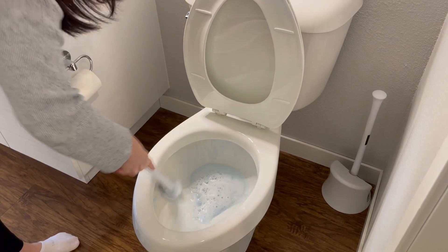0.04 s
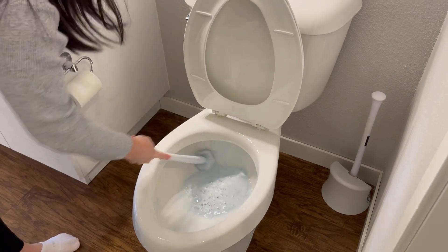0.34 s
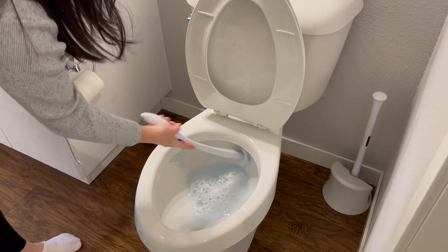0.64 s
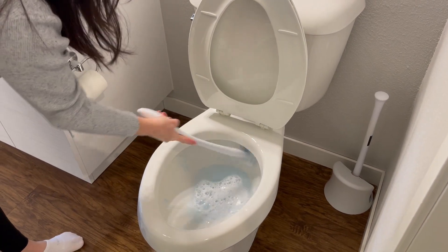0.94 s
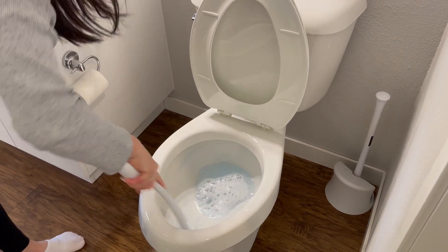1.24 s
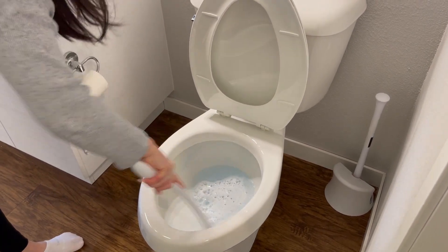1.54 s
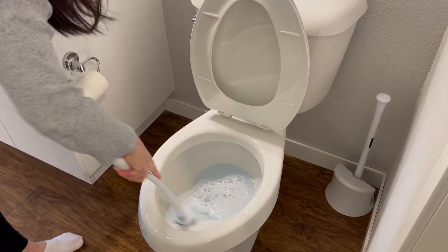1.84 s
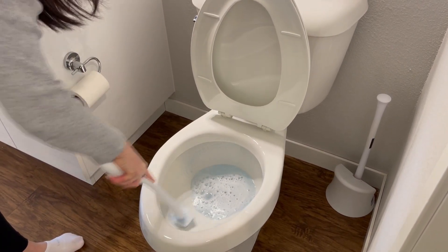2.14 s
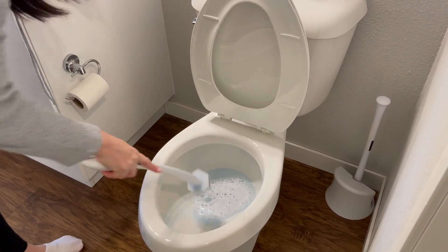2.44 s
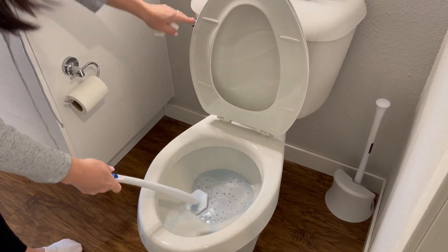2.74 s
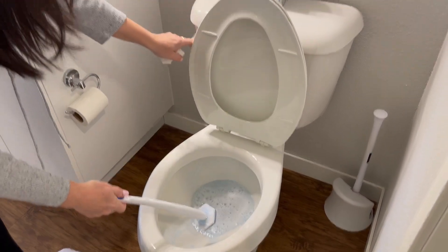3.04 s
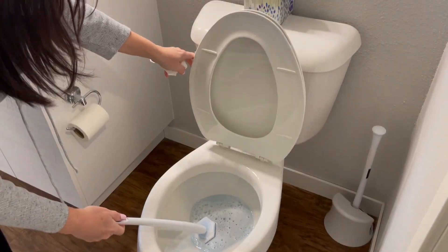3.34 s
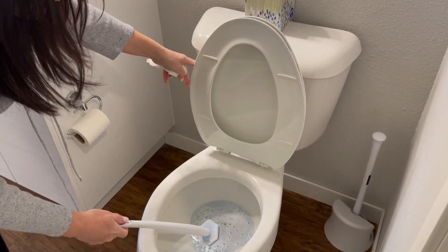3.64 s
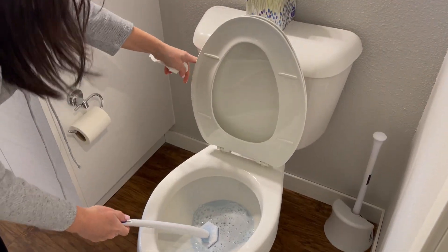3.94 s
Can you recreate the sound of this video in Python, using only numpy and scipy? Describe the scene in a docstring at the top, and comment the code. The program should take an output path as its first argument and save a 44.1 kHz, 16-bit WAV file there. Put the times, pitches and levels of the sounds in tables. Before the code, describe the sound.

A brush scrubs a wet toilet bowl with soft, uneven swishes and squelches until about 2.7 seconds, knocking on porcelain at the start, 0.5 and 1.4 seconds. A metal click and lid clack come near 2.8. At 3.5 the flush lever clunks and its chain chinks; a louder valve thump at 3.7 starts water gurgling and rushing. A fan hums low throughout in the small bathroom.

```python
"""Scrubbing and flushing a toilet

A plastic cleaning wand scrubs a wet bowl in a small, hard-walled bathroom and knocks on the porcelain.
A metal click and the clack of the lid follow; then the flush lever is pressed, its chain chinks, the valve
thumps open and water starts to gurgle as pockets of air ring. A fan hums throughout."""
import sys
import numpy as np
from scipy import signal
from scipy.fft import rfft, irfft, next_fast_len
from scipy.io import wavfile
from scipy.ndimage import map_coordinates

SR = 44100
rng = np.random.default_rng(int(sys.argv[2]) if len(sys.argv) > 2 else 0)


def dump(signal):
    """Clip the signal to [-1, 1] and save it as 16-bit WAV at the path in sys.argv[1]."""
    limited = np.clip(np.atleast_2d(signal).T, -1, 1)
    pcm = np.round(limited * 32767).astype(np.int16)
    wavfile.write(sys.argv[1], SR, pcm)


N = 176400
T = np.arange(SR * 6 // 10) / SR  # time within one event, s


def amp(db):
    """Decibels to gain."""
    return 10 ** (np.asarray(db) / 20)


def unit(x):
    """Scale to rms 1."""
    return x / np.sqrt(np.mean(x ** 2) + 1e-20)


def burst(x):
    """Scale to the energy of 10 ms at rms 1."""
    return x / np.sqrt(np.sum(x ** 2) * 100 / SR + 1e-20)


def along(points, hz):
    """Interpolate (Hz, value) points on a log axis."""
    knots_hz, values = np.transpose(points)
    return np.interp(np.log(hz + 1), np.log(knots_hz + 1), values)


def filtered(x, response):
    """Apply a complex frequency response."""
    n = x.shape[-1]
    size = next_fast_len(n + 4096)
    return irfft(rfft(x, size) * response(np.fft.rfftfreq(size, 1 / SR)), size)[..., :n]


def coloured(x, spectrum):
    """Minimum-phase filter with the given (Hz, dB) shape."""
    size = 4096
    cepstrum = irfft(np.log(amp(along(spectrum, np.fft.rfftfreq(size, 1 / SR)))))
    cepstrum[1:size // 2] *= 2
    cepstrum[size // 2 + 1:] = 0
    return signal.fftconvolve(x, irfft(np.exp(rfft(cepstrum))))[:len(x)]


def wobble(per_s):
    """Smooth random curve, per_s knots a second."""
    return map_coordinates(rng.standard_normal(int(N * per_s / SR) + 4), [np.arange(N) * per_s / SR])


def ring(modes, attack_s):
    """Damped modes of a struck body; wider modes die sooner."""
    waves = sum(amp(db) * width * np.exp(-np.pi * width * T) * np.sin(2 * np.pi * (hz * T + rng.random()))
                for hz, width, db in modes)
    return burst(waves * (1 - np.exp(-T / attack_s)))


def crack(spectrum, t60_s):
    """Short noise of a contact."""
    return burst(coloured(rng.standard_normal(len(T)) * amp(-60 * T / t60_s), spectrum))


def grainy(spectrum, per_s, spread_db, share=1):
    """Tiny uneven impacts carry a share of the power, noise the rest; rms 1."""
    impacts = (rng.random(N) < per_s / SR) * rng.choice([-1, 1], N)
    grains = unit(impacts * amp(spread_db * np.minimum(rng.exponential(size=N), 5)))
    return unit(coloured(np.sqrt(share) * grains + np.sqrt(1 - share) * rng.standard_normal(N), spectrum))


# Each row: frequency in Hz, left-right correlation.
COHERENCE = [(100, 0.98), (300, 0.81), (900, 0.097), (1700, 0.043), (3000, 0.37), (7000, 0.35),
             (8300, 0.63), (10200, 0.86), (12000, 0.28)]


def diffuse(pair):
    """Two unrelated signals become the left and right of a diffuse field."""
    turn = lambda hz: np.arccos(np.clip(along(COHERENCE, hz), -1, 1)) / 2
    mid, side = filtered(pair, lambda hz: np.array([np.cos(turn(hz)), np.sin(turn(hz))]))
    return np.array([mid + side, mid - side])


# Each row: frequency in Hz, T60 in seconds.
ROOM_DECAY = [(100, 0.86), (250, 0.36), (1400, 0.65), (4000, 0.42), (9000, 0.3), (13000, 0.21)]


def room(x, wet_db):
    """Direct sound plus a diffuse tail off the hard walls."""
    hz, t, bins = signal.stft(rng.standard_normal((2, len(T))), SR, nperseg=256)
    decay = amp(-60 * t / along(ROOM_DECAY, hz)[:, None])
    tail = signal.istft(bins * decay, SR, nperseg=256)[1][:, :len(T)]
    tail = diffuse(tail * (1 - np.exp(-T / 0.0013)))
    tail /= np.linalg.norm(tail[0])
    return x + amp(wet_db) * signal.fftconvolve(x[None], tail, axes=1)[:, :len(x)]


def play(events, sound, wet_db):
    """Place sound(*rest) in the room for each (start s, gain dB, *rest) row."""
    out = np.zeros((2, N))
    for start_s, db, *rest in events:
        event = room(amp(db) * sound(*rest), wet_db)
        start = round(start_s * SR)
        first, end = max(start, 0), min(start + event.shape[1], N)
        if end > first:
            out[:, first:end] += event[:, first - start:end - start]
    return out


# Motor tones and air spectrum. Each row: frequency in Hz, level in dB.
FAN_TONES = [(119.7, -49.5), (74.8, -67)]
FAN_AIR = [(35, -1.5), (70, 4), (100, -1), (300, -7.5), (500, -19), (2000, -30.5), (4000, -43.5),
           (12000, -48)]


def fan():
    """Motor hum over a low rumble of air."""
    t = np.arange(N) / SR
    hum = sum(amp(db + 0.097 * wobble(4.3)) * np.sin(2 * np.pi * hz * t + 0.08 * wobble(6.2))
              for hz, db in FAN_TONES)
    air = filtered(diffuse(rng.standard_normal((2, N))), lambda hz: amp(along(FAN_AIR, hz)))
    return np.sqrt(2) * hum + amp(-54.5) * unit(air)


# Each row: start in seconds, gain in dB.
METAL_CLICKS = [(2.8295, -36), (3.168, -72.5), (3.212, -74)]
# Each row: mode in Hz, width in Hz, gain in dB.
METAL_MODES = [(1420, 24, -10), (4300, 94, -11), (6670, 130, -14), (8060, 170, -10.5), (8350, 190, -3.5),
               (10540, 120, -10.5)]
# Each row: frequency in Hz, gain in dB.
CLICK_SPECTRUM = [(1000, -17), (4400, -11.5), (7400, -4.5), (9500, 0), (11000, 3.5), (13200, -23)]


def metal_clicks():
    """A small metal part clicks and rings brightly."""
    click = lambda: amp(-5) * ring(METAL_MODES, 0.00048) + amp(-7) * crack(CLICK_SPECTRUM, t60_s=0.011)
    return play(METAL_CLICKS, click, wet_db=6.5)


# Each row: start in seconds, gain in dB.
LID_CLACKS = [(2.864, -31.5)]
# Each row: mode in Hz, width in Hz, gain in dB.
LID_MODES = [(191.5, 26, 5.5), (650, 42, -1.5), (900, 13, -6), (1410, 63, -10), (1500, 82, -1),
             (1906, 26, -2.5), (2330, 41, -14), (3250, 90, -5.5)]
# Each row: frequency in Hz, gain in dB.
LID_SPECTRUM = [(200, 5), (900, 5), (1700, -4.5), (2600, -7), (5000, -18), (7000, -36)]


def lid():
    """The raised lid clacks: a brief hollow ring and a dull thud that fills the room."""
    body = play(LID_CLACKS, lambda: amp(-2.5) * ring(LID_MODES, attack_s=0.0026), wet_db=-4)
    thud = play(LID_CLACKS, lambda: amp(-6) * crack(LID_SPECTRUM, t60_s=0.067), wet_db=3)
    return body + thud


# Each row: start in seconds, gain in dB.
LEVER_HITS = [(3.519, -30), (3.523, -32), (3.529, -34.5)]
# Each row: mode in Hz, width in Hz, gain in dB.
LEVER_MODES = [(236, 53, 3), (437, 21, 3), (610, 110, 0), (1124, 17, -14), (1400, 19, 0), (2653, 90, -5.5),
               (3100, 210, 0.5)]
# Each row: frequency in Hz, gain in dB.
LEVER_SPECTRUM = [(250, -9), (550, -0.5), (1500, -4.5), (2200, -12), (4200, -18.5), (9000, -17.5),
                  (11500, -16), (13200, -43)]


def lever():
    """The pressed flush lever makes a quick cluster of contacts."""
    hit = lambda: amp(-3) * ring(LEVER_MODES, 0.0015) + amp(-6.5) * crack(LEVER_SPECTRUM, t60_s=0.13)
    return play(LEVER_HITS, hit, wet_db=-1)


# Each row: start in seconds, gain in dB.
CHAIN_CHINKS = [(3.612, -38.5), (3.689, -39.5), (3.734, -32), (3.742, -40), (3.79, -55)]
# Each row: frequency in Hz, gain in dB.
CHINK_SPECTRUM = [(2000, -4), (3000, -6.5), (5000, -14), (7000, -9), (8300, -1.5), (9800, 3.5), (11500, 1),
                  (13300, -19)]
RASP_SPECTRUM = [(3200, -3.5), (4200, 7.5), (5800, 4), (7000, -18), (9500, -18), (13000, -36)]


def chain(taut_s=3.611, rasp_db=-40.5):
    """The lever's chain chinks, and rasps as it drags taut."""
    chinks = play(CHAIN_CHINKS, lambda: crack(CHINK_SPECTRUM, t60_s=0.1), wet_db=3)
    rasp = play([(taut_s, rasp_db)], lambda: crack(RASP_SPECTRUM, t60_s=0.2), wet_db=2.5)
    return chinks + rasp


# Each row: start in seconds, gain in dB.
VALVE_THUMPS = [(3.69, -24.5), (3.6975, -17), (3.727, -23.5)]
WATER_SHOVES = [(3.6985, -20), (3.727, -31.5)]
# Each row: mode in Hz, width in Hz, gain in dB.
TANK_MODES = [(226, 26, -1), (345, 29, 3), (421, 49, -.5), (834, 64, -12), (1100, 48, -2.5),
              (1177, 22, -3.5)]
WALL_MODES = [(150, 41, -4.5), (302, 130, -6)]
# Each row: frequency in Hz, gain in dB.
THUMP_SPECTRUM = [(50, -27.5), (130, 3.5), (380, 2.5), (700, -6.5), (1300, 0), (2200, -18.5), (6000, -32)]


def valve():
    """The valve thumps open and water shoves the tank wall."""
    thump = lambda: amp(-5) * ring(TANK_MODES, 0.00087) + amp(-11) * crack(THUMP_SPECTRUM, t60_s=0.05)
    shoves = play(WATER_SHOVES, lambda: ring(WALL_MODES, attack_s=0.0039), wet_db=-3)
    return play(VALVE_THUMPS, thump, wet_db=-0.5) + shoves


# Each row: start in seconds, pitch in Hz, gain in dB, T60 in seconds.
AIR_POCKETS = [(3.659, 670, -23.5, 0.058), (3.808, 684, -29.5, 0.11), (3.822, 746, -36, 0.13),
               (3.828, 351.4, -30.5, 0.14), (3.836, 628.5, -34.5, 0.18), (3.845, 1078, -39, 0.24),
               (3.866, 353.5, -27.5, 0.12), (3.876, 661, -32, 0.12), (3.925, 694, -43, 0.19),
               (3.965, 1380, -45, 0.1), (3.968, 325, -36, 0.1)]


def glugs(attack_s=0.0035, glide_per_s=-0.26):
    """Pockets of air pushed out by the water ring, sinking slightly in pitch."""
    def glug(hz, t60_s):
        tone = np.sin(2 * np.pi * hz * T * (1 + glide_per_s * T / 2))
        return 2 * tone * amp(-60 * T / t60_s) * (1 - np.exp(-T / attack_s))
    return play([(s, db, hz, t60_s) for s, hz, db, t60_s in AIR_POCKETS], glug, wet_db=-5.5)


# Each row: time in seconds, level in dB.
FLOW_LEVELS = [(3.518, -51), (3.56, -50), (3.68, -42), (3.73, -59), (3.8, -41), (3.88, -38.5), (4.0, -44.5)]
# Rush, and the hiss of both drops and pad. Each row: frequency in Hz, gain in dB.
RUSH_SPECTRUM = [(130, -3), (330, 6.5), (500, -7.5), (680, -1.5), (900, -8.5), (1100, -8), (2200, -17.5),
                 (6500, -28), (11500, -26), (13000, -94)]
HISS_SPECTRUM = [(900, -32), (2500, -5), (4600, -1), (7300, -5), (8800, 2), (11200, 1.5), (12800, -48)]


def water():
    """Water rushes unevenly into the rim and throws up drops."""
    times_s, db = np.transpose(FLOW_LEVELS)
    flow = amp(np.interp(np.arange(N) / SR, times_s, db, left=-120) + 5.06 * wobble(30))
    spatter = amp(-19) * grainy(HISS_SPECTRUM, per_s=120, spread_db=2.5)
    rush = grainy(RUSH_SPECTRUM, per_s=900, spread_db=1.9, share=0.93)
    return room(flow * (rush + spatter), wet_db=-4)


# Each row: start in seconds, gain in dB, extra gain of the bowl's ring in dB.
WAND_KNOCKS = [(-.03, -33.5, 1.5), (0.493, -32.5, -7.5), (1.366, -36.5, 0.5)]
# Each row: mode in Hz, width in Hz, gain in dB.
WAND_MODES = [(341, 80, -0.5), (1665, 34, -5), (1914, 78, -12.5), (3320, 28, -14)]
BOWL_MODES = [(1041, 13, -0.5), (1108, 9, 3), (1153, 14, 0)]
# Each row: frequency in Hz, gain in dB.
KNOCK_SPECTRUM = [(150, -19.5), (350, 3), (700, -2), (1500, -8.5), (2600, -17.5), (6000, -9), (7300, -11),
                  (11000, -7), (13000, -38)]


def knocks():
    """The plastic wand thuds briefly; the porcelain rings a little longer."""
    hit = lambda: amp(-7.5) * ring(WAND_MODES, 0.0015) + amp(-2.5) * crack(KNOCK_SPECTRUM, t60_s=0.044)
    rings = [(s, db + bowl_db) for s, db, bowl_db in WAND_KNOCKS]
    porcelain = play(rings, lambda: ring(BOWL_MODES, attack_s=0.0005), wet_db=-7)
    return play([row[:2] for row in WAND_KNOCKS], hit, wet_db=-2.5) + porcelain


# Each row: start in seconds, length in seconds, gain in dB, first and last pitch in Hz.
PAD_SLIDES = [(0.969, .35, -63.5, 1397, 2910), (2.629, 0.17, -73, 3250, 1790)]


def smears(width_hz=450):
    """Suds squeezed under the sliding pad: a wet rasp that swells, fades and glides."""
    def smear(length_s, from_hz, to_hz):
        progress = np.minimum(T / length_s, 1)
        suds = filtered(rng.standard_normal(len(T)), lambda hz: np.exp(-(hz / width_hz) ** 2))
        phase = 2 * np.pi * np.cumsum(from_hz + (to_hz - from_hz) * progress) / SR
        return np.sin(np.pi * progress) * unit(suds * np.cos(phase))
    return play([(s, db, length_s, *glide) for s, length_s, db, *glide in PAD_SLIDES], smear, wet_db=-10.5)


def squelch(pitch_hz):
    """A flurry of tiny bursting bubbles around one pitch."""
    fizz = rng.standard_normal(len(T)) * (1 - np.exp(-T / 0.0048)) * amp(-60 * T / 0.037)
    return burst(filtered(fizz, lambda hz: 1 / (1 + 1j * (hz - pitch_hz) / (0.092 * pitch_hz)) ** 2))


def bubbles(wetness, count=70, low_hz=1280, high_hz=5520):
    """Stray bubbles burst at random, louder where the pad is wetter."""
    pops = []
    for when, size, pitch in rng.random((count, 3)):
        db = -10.5 + 20 * np.log10(wetness[int(when * N)] * 2 * size + 1e-12)
        pops.append((when * N / SR, db, low_hz * (high_hz / low_hz) ** pitch))
    return play(pops, squelch, wet_db=-8.5)


def bowl_hollow(hz, width_hz=44):
    """Air resonances of the bowl."""
    peaks = sum(1 / (1 + 2j * (hz - centre_hz) / width_hz) for centre_hz in (1070, 1350, 1890))
    return 1 + amp(7) * peaks


# Each row: middle in seconds, length in seconds, wet swish gain in dB, dry hiss gain in dB.
PAD_STROKES = [(0.16, 0.42, -57.5, -57.5), (0.455, 0.1, -56.5, -64.5), (0.617, 0.2, -60.5, -58),
               (0.821, 0.082, -57, -57), (0.953, 0.1, -57.5, -58), (1.067, 0.11, -55.5, -57.5),
               (1.25, 0.41, -59, -57.5), (1.627, 0.13, -60.5, -62), (1.76, 0.06, -56, -60.5),
               (1.85, 0.096, -55.5, -57.5), (2.024, 0.13, -62, -61.5), (2.152, 0.089, -59.5, -61),
               (2.25, 0.077, -57, -60.5), (2.36, 0.15, -68, -67), (2.674, 0.27, -99, -67.5)]
# Each row: start in seconds, gain in dB.
PAD_TICKS = [(.224, -72), (1.363, -43), (1.529, -63), (1.842, -54), (1.8685, -49.5), (2.15, -56),
             (2.374, -63), (2.625, -58.5)]
# Each row: start in seconds, gain in dB, pitch in Hz.
PAD_SQUELCHES = [(.224, -60, 1750), (.321, -61.5, 4400), (.354, -66, 4740), (.432, -54.5, 1710),
                 (.824, -58, 4540), (.928, -62, 4500), (1.313, -56.5, 4850), (1.665, -59.5, 1800),
                 (1.738, -60, 1770), (2.258, -62, 1390), (2.26, -62.5, 4900)]
# Each row: frequency in Hz, gain in dB.
SWISH_SPECTRUM = [(250, -4.5), (700, 6.5), (1100, 1), (1900, 2.5), (3000, 1.5), (6000, -31)]
TICK_SPECTRUM = [(1000, -5.5), (2200, 5.5), (4700, 4.5), (7300, -2.5), (9000, -1), (11000, -5),
                 (13000, -74)]


def scrubbing():
    """Each stroke swells and fades; the pad catches unevenly, swishes, hisses, ticks and squelches."""
    t = np.arange(N) / SR
    swell = lambda s, length: np.exp(-(2 * (t - s) / length) ** 2)
    wetness = np.sqrt(sum(amp(db) ** 2 * swell(s, length) for s, length, db, _ in PAD_STROKES))
    dryness = np.sqrt(sum(amp(db) ** 2 * swell(s, length) for s, length, _, db in PAD_STROKES))
    wet_grains = grainy(SWISH_SPECTRUM, per_s=600, spread_db=2.4, share=0.69)
    swish = wetness * unit(filtered(wet_grains, bowl_hollow))
    hiss = dryness * grainy(HISS_SPECTRUM, per_s=3600, spread_db=0.5)
    catching = amp(-5.5 + 2.37 * wobble(60.08))
    rub = room((swish + hiss) * catching, wet_db=-4)
    ticks = play(PAD_TICKS, lambda: crack(TICK_SPECTRUM, t60_s=0.05), wet_db=-1.5)
    return rub + ticks + smears() + bubbles(wetness) + play(PAD_SQUELCHES, squelch, wet_db=-5)


def scene():
    """Cleaning, then the flush, over the fan."""
    cleaning = scrubbing() + knocks() + metal_clicks() + lid()
    flush = lever() + chain() + valve() + glugs() + water()
    return cleaning + flush + fan()


# Each row: frequency in Hz, phase lead of left over right in radians.
LEFT_LEAD = [(300, 0), (1500, -.1), (3000, 1), (6700, 0), (7400, 1), (8600, 0), (10230, -3.14),
             (11900, -6.28)]
# Each row: frequency in Hz, left over right in dB.
LEFT_BALANCE = [(120, 1), (450, 2.5), (1600, -1.5), (3000, 2.5), (5000, 5.5), (7200, 3.5), (8500, 0.3),
                (12000, 0.5)]
LOW_HZ, TOP_HZ = 30, 12800


def record(dry):
    """Two band-limited microphones that differ in phase and level."""
    def response(hz):
        lead = np.interp(hz, *np.transpose(LEFT_LEAD))
        left = np.exp(0.5j * lead) * amp(along(LEFT_BALANCE, hz) / 2)
        highpass = hz ** 4 / (hz ** 4 + LOW_HZ ** 4)
        lowpass = 1 / np.sqrt(1 + (hz / TOP_HZ) ** 80)
        return np.array([left, 1 / left]) * highpass * lowpass
    return filtered(dry, response)


dry = scene()
out = record(dry)
dump(out)
```